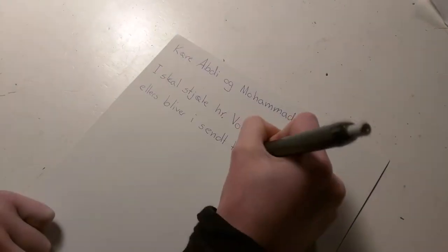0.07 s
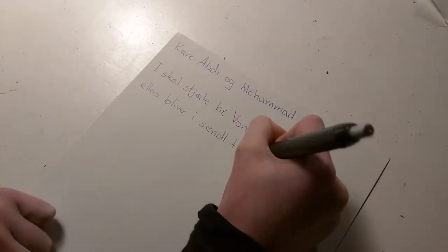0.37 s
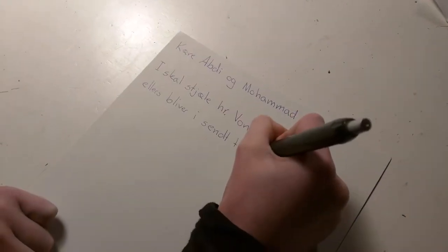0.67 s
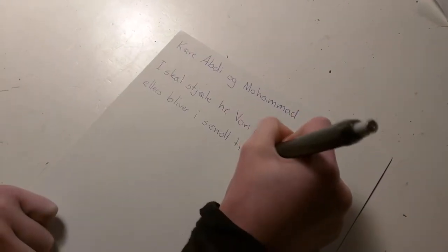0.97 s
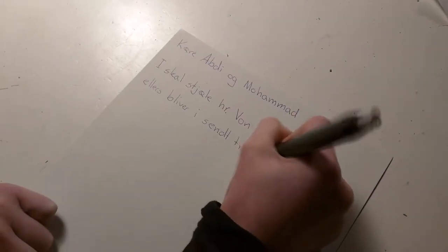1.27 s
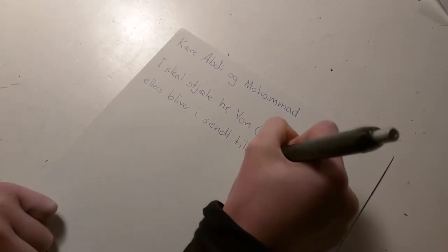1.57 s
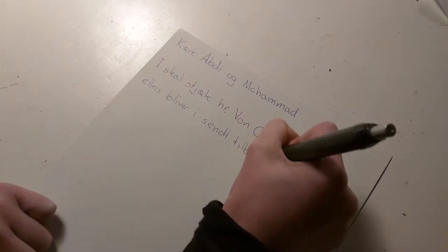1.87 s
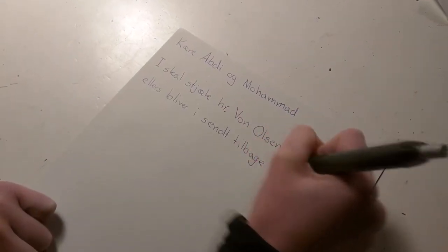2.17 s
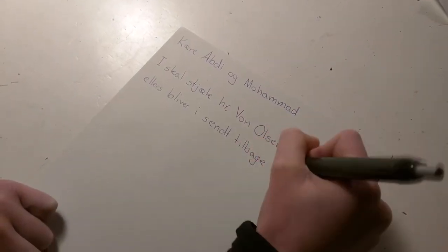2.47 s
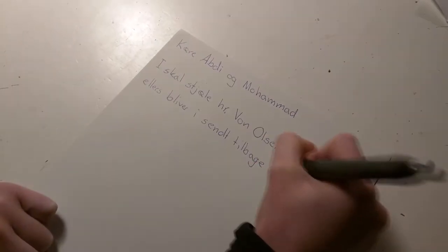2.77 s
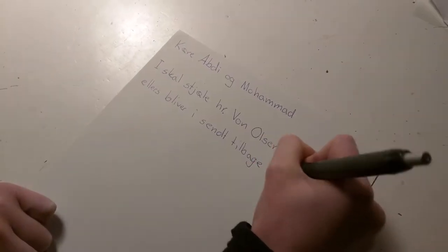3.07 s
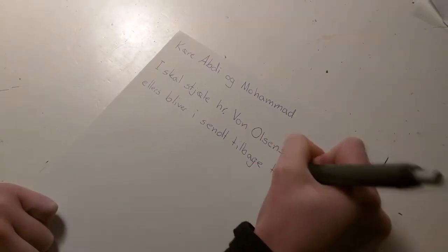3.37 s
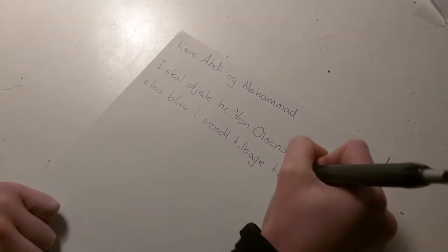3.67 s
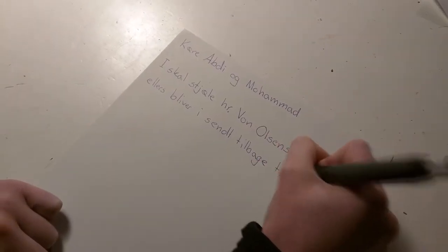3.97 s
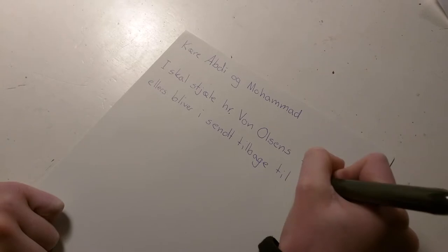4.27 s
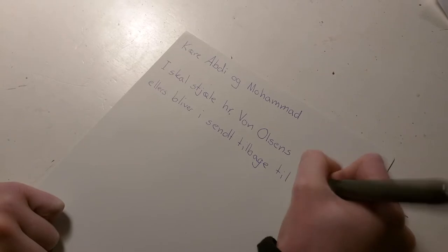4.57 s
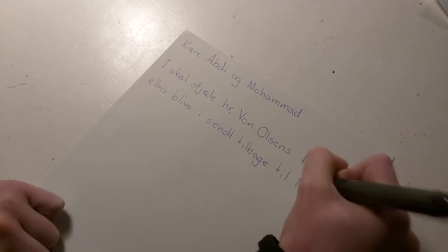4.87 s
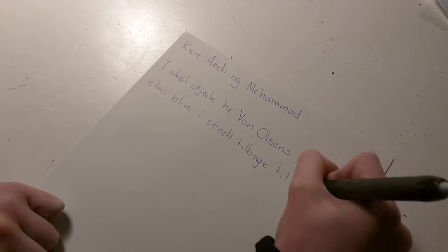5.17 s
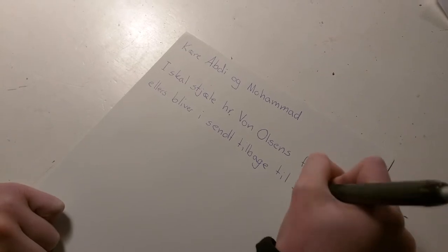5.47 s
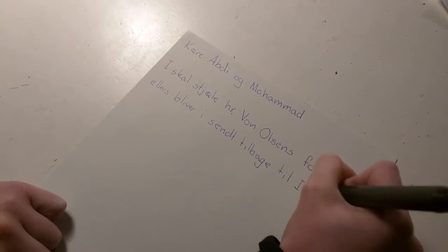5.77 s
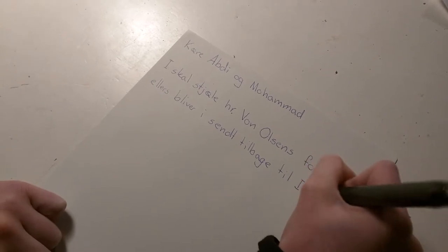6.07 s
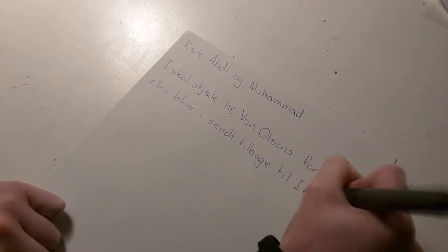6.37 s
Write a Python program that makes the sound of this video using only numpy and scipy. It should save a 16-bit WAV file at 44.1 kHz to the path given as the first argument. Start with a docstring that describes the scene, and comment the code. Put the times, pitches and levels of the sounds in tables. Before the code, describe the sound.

A ballpoint pen writes on a single sheet of paper on a hard table, close to the microphone in a quiet room. Quick, dry strokes come in short runs, each with a low thrum from the tabletop. Between runs the tip lands with light ticks and knocks, and the hand slides with soft hisses. Three sharper knocks with a tiny pen rattle stand out in the second half.

```python
"""Quick ballpoint strokes thrum and rasp on one sheet of paper on a hard table: the ball rolls over fibres
and rings table top and tip. Sliding hand and pen strokes add brief, soft hisses. The pen lands with a tick,
a knock and a short rattle of the refill. The resting hand sways the table; the shaking reaches the two
microphone ports of a camera close by. Quiet room air and a thin whine lie underneath."""
import sys
import numpy as np
from scipy import signal
from scipy.fft import rfft, irfft
from scipy.io import wavfile
from scipy.ndimage import uniform_filter1d

SR = 44100
rng = np.random.default_rng(int(sys.argv[2]) if len(sys.argv) > 2 else 0)


def wav_record(signal):
    """Record a signal, one row per channel, as 16-bit PCM in the file named by sys.argv[1]."""
    frames = np.transpose(np.atleast_2d(signal))
    bounded = np.clip(frames, -1, 1)
    # unit amplitude maps onto the largest positive 16-bit level
    quanta = np.round(bounded * 32767).astype(np.int16)
    wavfile.write(sys.argv[1], SR, quanta)


N = 287973
T = np.arange(N) / SR

# Levels are relative, ahead of mix gains. Side is left minus right.
# evenly paced strokes, push and pull in turn:
# first t/s, last t/s, length/s, rasp over thrum/dB, hiss over thrum/dB, [thrum level/dB per stroke]
STROKE_RUNS = [(.012, .12, .049, -21.3, -24.5, [-34, -30.5]),
               (.207, .92, .051, -20.3, -32, [-34.5, -33, -36, -39.5, -32.5, -28.5, -33, -36.5]),
               (1.008, 1.101, 0.044, -20.5, -23.5, [-28, -28]),
               (1.19, 1.679, .042, -18.9, -13, [-26.2, -30, -26.5, -28.6, -28.8, -31.3, -27.5]),
               (1.765, 1.765, .037, -14.3, -21, [-27.5]),
               (2.713, 3.113, .044, -20.8, -31, [-25, -30, -35, -35.5, -37.5, -38]),
               (3.27, 3.588, .045, -20.3, -28, [-42.5, -36.5, -40, -43, -40.5]),
               (3.832, 4.062, .039, -18.5, -23.5, [-35.3, -34.3, -38.5, -39.7]),
               (4.229, 4.716, .043, -18.3, -27, [-43.5, -41.5, -36, -44.5, -41.5, -37, -36.3]),
               (4.913, 4.913, .043, -17, -34, [-28.5]),
               (5.09, 5.272, .047, -15.7, -32, [-37.5, -30.5, -43]),
               (5.39, 5.528, .068, -17.3, -27, [-36, -35.5, -32]),
               (5.922, 6.294, .041, -20.3, -33, [-29.7, -44, -36, -36.5, -37]),
               (6.405, 6.518, .037, -22, -31, [-35.3, -35.7])]
# brief hisses on the sheet, from the sliding hand or a pen stroke: middle t/s, length/s, level/dB
PAPER_SWISHES = [(.93, .031, -55.5), (1.782, .02, -44), (1.823, .02, -42), (1.99, .048, -57.5),
                 (2.062, 0.037, -52), (2.125, 0.054, -48), (2.355, .05, -61), (2.94, .061, -54.5),
                 (3.257, .035, -56), (3.344, .047, -54), (3.414, .058, -53), (3.538, .066, -55.5),
                 (3.677, 0.059, -52), (3.888, .08, -56), (4.02, 0.056, -55), (4.16, 0.046, -49),
                 (4.295, 0.032, -52.5), (4.465, .06, -50), (4.57, .048, -53.5), (4.648, .058, -49),
                 (4.79, .04, -60), (5.49, .022, -54), (5.79, .037, -52.5)]
# hand weight rocking the table: t/s, level/dB
SWAY_LEVELS = [(0, -29), (1.25, -26.5), (1.85, -23.5), (2.2, -37.5), (2.55, -35), (2.9, -30), (4.5, -31.5),
               (5.501, -29), (6.53, -30.5)]
# pen or hand lands, or loose pen parts tick: t/s, tick level/dB, knock level/dB
LANDINGS = [(.293, -26, -46), (1.8773, -35.5, -49), (1.978, -58, -33), (2.022, -48, -28.5),
            (2.4054, -46, -27.5), (2.608, -27, -58), (2.614, -45, -34), (2.6242, -34, -46),
            (2.637, -36, -32.5), (3.7574, -18, -16), (3.785, -33, -49), (4.199, -35.5, -34.5),
            (4.231, -33, -39), (4.8532, -19.7, -15), (5.0215, -20.7, -15.3), (5.4749, -31, -30),
            (5.8453, -24, -22), (5.875, -39, -54), (6.258, -37, -56)]
# resonances: f/Hz, t60/s, level at first spot/dB, level at second spot/dB, side/dB
TABLE_MODES = [(81.3, 0.19, -4, -3, -1), (135.2, 0.14, -7.5, -13.5, -1.5), (158, .07, -15, -19, 9),
               (210.2, 0.079, -5.5, -8, 2), (273.5, 0.069, -4.5, -3.5, -3.5), (316, 0.038, -5.5, -13.5, 1),
               (386, 0.033, -5.5, -22, -15.5), (440, 0.042, -7, -19.5, -4.5), (552.9, 0.082, -8, -8, 3.5),
               (718, 0.032, -14, -12.5, -13), (830, 0.043, -20, -21, -4)]
TIP_MODES = [(760, 0.028, -4.5, -1.5, -6), (967, 0.028, -3.5, -7, -4), (1172, 0.12, -8.5, -9, -8),
             (1340, 0.044, -2.5, -21, -3), (1463, 0.021, 0.5, 1, 1), (1747, 0.02, -8.5, 1, -9),
             (1915, 0.034, -3.5, 1, -5), (2150, 0.013, -21, -6, -4), (2670, 0.011, -9, -9.5, 2)]  # pen and the sheet under it
# spectral densities: f/Hz, level/dB
THRUM_SPECTRUM = [(20, -20), (45, -5.5), (80, 7), (130, 5.5), (280, -6.5), (400, -16.5), (560, -25),
                  (750, -28.5), (1100, -40.5), (2500, -48), (6000, -51)]
RASP_SPECTRUM = [(200, -14), (600, 0.5), (1100, -7), (1900, -5), (2400, -5.5), (3200, -6.5), (4300, -10),
                 (6000, -10), (10000, -14), (15000, -23.5)]
HISS_SPECTRUM = [(100, 14), (500, -5.5), (1200, -8.5), (2200, -1.5), (4200, -4), (5500, -3), (6500, -0.5),
                 (7600, 0), (10000, -0.5), (12000, -3.5), (15000, -14)]
SWAY_SPECTRUM = [(5, -2.5), (14, 11), (31, -1), (45, 1), (65, -13.5), (120, -32), (250, -64), (800, -61.5)]
AIR_SPECTRUM = [(20, 3.5), (90, -3.5), (250, -16), (600, -21), (1200, -25.5), (2000, -29.5), (4000, -34.5),
                (10000, -36), (15000, -42)]
TICK_SPECTRUM = [(300, -38), (1500, -8), (3000, 2.5), (5800, 4.5), (9000, 3), (11500, 2), (15000, -9.5)]
RATTLE_SPECTRUM = [(500, -12), (2500, -4.5), (4000, -9), (6000, -12), (8000, -9), (11000, -2.5),
                   (15000, -31)]
# likeness of the two ports: f/Hz, correlation (-1..1)
SOLID_CORRELATION = [(30, -.75), (130, -0.51), (200, -0.3), (300, 0.82), (550, 1), (1000, 0.87),
                     (3000, 0.77)]  # low table shaking arrives in opposite sign
AIR_CORRELATION = [(60, -0.19), (300, 0.29), (1000, 0.35), (3000, 0.7), (6500, 0.16), (14000, 0.39)]
# hiss balance: f/Hz, side/dB
HISS_BALANCE = [(300, -13), (2000, -5), (3500, -5.5), (5700, -8.5), (7500, -11.5), (10000, -1),
                (14000, -9.5)]
# room decay: f/Hz, t60/s
ROOM_DECAY = [(100, 0.74), (1000, 0.48), (5000, 0.17), (15000, 0.055)]
# hand moves from first to second spot: start t/s, end t/s
HAND_MOVE_S = (1.73, 2.4)


def amp(db):
    """Decibels to gain."""
    return 10 ** (np.asarray(db) / 20)


def unit(x):
    """Scale to rms 1."""
    return x / np.sqrt(np.mean(x ** 2) + 1e-20)


def read(points, hz):
    """Interpolate a table over log frequency."""
    knots_hz, values = np.transpose(points)
    return np.interp(np.log(hz + 1), np.log(knots_hz + 1), values)


def pan(side_db):
    """Left and right gains at constant power."""
    gains = amp(np.array([np.atleast_1d(side_db), -np.atleast_1d(side_db)]) / 2)
    return gains / np.sqrt((gains ** 2).mean(0))


def add(mix, start_s, sound):
    """Mix in a stereo sound."""
    part = mix[:, round(start_s * SR):][:, :sound.shape[1]]
    part += sound[:, :part.shape[1]]


def convolve(x, response):
    """Filter each channel; at most N samples."""
    return signal.fftconvolve(np.atleast_2d(x), np.atleast_2d(response), axes=1)[:, :N]


def colour(spectrum, size=2048):
    """Causal impulse response of energy 1 for a spectrum."""
    log_gain = np.log(amp(read(spectrum, abs(np.fft.fftfreq(size, 1 / SR)))))
    response = np.fft.ifft(np.exp(np.conj(signal.hilbert(log_gain)))).real
    return response / np.linalg.norm(response)


def ports(pair, spectrum, correlation, side_db):
    """Two independent noises to coloured, partly correlated stereo of rms 1."""
    hz = np.fft.rfftfreq(N, 1 / SR)
    a, b = rfft(pair)
    same = np.clip(read(correlation, hz), -1, 1)
    mid, side = a * np.sqrt(1 + same), b * np.sqrt(1 - same)
    stereo = np.array([mid + side, mid - side])
    return unit(irfft(stereo * amp(read(spectrum, hz)) * pan(side_db), N))


def fibres(snags_per_s, spread_db, rub_gain):
    """Two trains of tiny, uneven snags over steady rubbing noise."""
    snags = (rng.random(N) < snags_per_s / SR) * amp(spread_db * np.minimum(rng.exponential(1, N), 4))
    return unit(snags * rng.standard_normal((2, N))) + rub_gain * rng.standard_normal((2, N))


def flutter(rate_hz, depth_db):
    """Randomly wandering gain, as when friction grips and lets go."""
    knots = rng.standard_normal(N)
    return amp(depth_db * np.interp(T * rate_hz, np.arange(N), knots))


def patchy(x, depth_db):
    """Drifting noise colour, as when new patches of paper make contact."""
    bins = signal.stft(x, nperseg=512)[2]
    patches = uniform_filter1d(rng.standard_normal(bins.shape[1:]), size=7, axis=0)
    patches = unit(uniform_filter1d(patches, size=10, axis=1))
    return unit(signal.istft(bins * amp(depth_db * patches), nperseg=512)[1][:, :N])


def swells(middles_s, lengths_s, levels_db, rise, fall):
    """Envelope of a series of movements; higher rise or fall is more abrupt."""
    t = T[::32]
    power = sum(amp(db) ** 2 * np.exp(-abs(2 * (t - s) / length_s) ** np.where(t < s, rise, fall))
                for s, length_s, db in zip(middles_s, lengths_s, levels_db))
    return np.interp(T, t, np.sqrt(power))


def mode(hz, t60_s, side_db):
    """One decaying resonance; the lowest push the ports opposite ways."""
    t = T[:SR // 4]
    phase_rad = np.arccos(np.clip(read(SOLID_CORRELATION, hz), -1, 1)) * np.array([[.5], [-.5]])
    return pan(side_db) * np.exp(-np.log(1000) * t / t60_s) * np.sin(2 * np.pi * hz * t + phase_rad)


def ringing(modes, drive, wander_db):
    """Friction drives each mode by an amount set by the ball's position."""
    out = 0
    for hz, t60_s, first_db, second_db, side_db in modes:
        spot_db = np.interp(T, HAND_MOVE_S, [first_db, second_db])
        coupling = amp(spot_db) * flutter(rate_hz=14, depth_db=wander_db)
        ring = mode(hz, t60_s, side_db)
        force = drive(hz) * coupling * rng.standard_normal(N)
        out = out + convolve(force, ring) / np.linalg.norm(ring)
    return out


def strokes(pull_lag_s=.004, pull_rasp_db=-1.2, pull_hiss_db=-15, shortening_per_db=.015, bite=.1):
    """Runs to strokes. Pulls come late, with less rasp and hiss; strong strokes are shorter, raspier."""
    rows = []
    for first_s, last_s, length_s, rasp_db, hiss_db, levels_db in STROKE_RUNS:
        beats_s = np.linspace(first_s, last_s, len(levels_db))
        for k, (beat_s, thrum_db) in enumerate(zip(beats_s, levels_db)):
            pulled, accent_db = k % 2, thrum_db - np.mean(levels_db)
            rows.append((beat_s + pulled * pull_lag_s,
                         length_s * np.exp(-shortening_per_db * accent_db),
                         thrum_db,
                         thrum_db + rasp_db + bite * accent_db + pulled * pull_rasp_db,
                         thrum_db + hiss_db + pulled * pull_hiss_db))
    return np.transpose(rows)


def writing(even_db=16.5, pivot_hz=260, brightening=.91):
    """The ball bumps over fibres: the table thrums and rings below, the tip rasps above."""
    middle_s, length_s, thrum_db, rasp_db, _ = strokes()
    grip = flutter(rate_hz=220, depth_db=1.62)

    def force(hz):
        """A fast, raspy stroke shifts its push from low modes to high."""
        tilt_db = brightening * np.log(hz / pivot_hz) * (rasp_db - thrum_db + even_db)
        return swells(middle_s, length_s, thrum_db + tilt_db, rise=4.3, fall=3.4) * grip

    coarse = fibres(snags_per_s=900, spread_db=3, rub_gain=.86)
    thrum = force(hz=113) * ports(coarse, THRUM_SPECTRUM, SOLID_CORRELATION, side_db=1)
    speed = swells(middle_s, length_s, rasp_db, rise=2.6, fall=3) * grip
    fine = fibres(snags_per_s=2200, spread_db=2.5, rub_gain=1)
    rasp = speed * patchy(ports(fine, RASP_SPECTRUM, AIR_CORRELATION, side_db=-4), depth_db=2.5)
    table = ringing(TABLE_MODES, force, wander_db=3.5)
    tip = ringing(TIP_MODES, lambda hz: speed, wander_db=2)
    return amp(-2) * thrum + amp(-4) * table + amp(-1) * rasp + amp(-2.4) * tip


def paper_hiss(lag_s=.004, stroke_share=.88):
    """Bright friction, to the right: brief swishes of hand or pen, plus the hiss of the stroke runs."""
    middle_s, length_s, _, _, hiss_db = strokes()
    swishes = swells(*np.transpose(PAPER_SWISHES), rise=2.6, fall=2.9)
    runs = swells(middle_s + lag_s, stroke_share * length_s, hiss_db, rise=2.3, fall=2.8)
    side_db = read(HISS_BALANCE, np.fft.rfftfreq(N, 1 / SR))
    grain = fibres(snags_per_s=7000, spread_db=0, rub_gain=1.25)
    hiss = patchy(ports(grain, HISS_SPECTRUM, AIR_CORRELATION, side_db), depth_db=3.5)
    return amp(3) * hiss * np.hypot(swishes, runs) * flutter(rate_hz=180, depth_db=2)


def table_sway():
    """The resting hand rocks the table: a very low rumble."""
    times_s, levels_db = np.transpose(SWAY_LEVELS)
    rumble = ports(rng.standard_normal((2, N)), SWAY_SPECTRUM, SOLID_CORRELATION, side_db=-2.5)
    return amp(np.interp(T, times_s, levels_db)) * rumble


def air_and_whine(whine_hz=1172, whine_db=-73):
    """Quiet room air and a thin, wavering tone."""
    noise = ports(rng.standard_normal((2, N)), AIR_SPECTRUM, AIR_CORRELATION, side_db=-1.5)
    air = amp(-47) * patchy(noise, depth_db=2.5)
    whine_gain = amp(whine_db) * flutter(rate_hz=12, depth_db=4)
    drift_rad = 4 * flutter(rate_hz=12, depth_db=.5)
    return air + whine_gain * np.sin(2 * np.pi * whine_hz * T + drift_rad)


def reflections(x, earliest_s=.001, spread_s=.014, count=10):
    """Echoes off hand, table and wall comb both ports alike."""
    delays_s = earliest_s + spread_s * rng.random(count)
    gains = rng.standard_normal(count)
    echoes = np.zeros(SR // 10)
    echoes[(delays_s * SR).astype(int)] = gains / np.linalg.norm(gains)
    return convolve(x, signal.lfilter([.5, -.5], [1, -.6], echoes))  # small surfaces return only treble


def room(x):
    """Small-room tail, shorter in the treble."""
    hz, t, bins = signal.stft(rng.standard_normal((2, SR // 2)), SR, nperseg=256)
    decay = np.exp(-np.log(1000) * t / read(ROOM_DECAY, hz)[:, None])
    tail = signal.istft(bins * decay, SR, nperseg=256)[1]
    return convolve(x, tail / np.linalg.norm(tail[0]))


def ticks(bounce_s=.0094, second_bounce_db=-4):
    """The tip ticks; the refill bounces twice in the barrel, looser after a hard knock."""
    out, t = np.zeros((2, N)), T[:SR // 4]
    barrel_buzz = np.exp(-t / .0015) + .12 * np.exp(-t / .0083)
    for start_s, tick_db, knock_db in LANDINGS:
        rattle_db = tick_db + np.interp(knock_db, [-21, -16], [-25, -4])
        hits = [(TICK_SPECTRUM, 1.1, tick_db), (RATTLE_SPECTRUM, .8, rattle_db),
                (RATTLE_SPECTRUM, .8, rattle_db + second_bounce_db)]
        for k, (spectrum, impulse, level_db) in enumerate(hits):
            crack = .17 * rng.standard_normal((2, len(t))) * barrel_buzz
            crack[:, 0] += impulse
            click = convolve(crack, colour(spectrum))
            add(out, start_s + k * bounce_s, amp(level_db + 1.5) * pan(side_db=-1.7) * click)
    return out


def knocks(lag_s=.001323, dip_hz=37, dip_decay_s=.024, push_s=.0032, t60_scale=.83, padded_hz=200):
    """A landing rings table and tip; the whole top dips and swings back."""
    out, t = np.zeros((2, N)), T[:SR // 4]
    # the hard tip favours upper modes and damps the table while pressed
    rings = [(hz, amp(db - 6.5) * (hz / 250) ** .2 * mode(hz, t60_scale * t60_s, side_db))
             for hz, t60_s, _, db, side_db in TABLE_MODES]
    tip = amp(-27) * sum(amp(db) * mode(hz, t60_s, side_db) for hz, t60_s, _, db, side_db in TIP_MODES)
    swing = np.sin(2 * np.pi * dip_hz * t) * np.exp(-t / dip_decay_s)
    push = .52 * t / push_s * np.exp(-(t / push_s) ** 2)
    dip = amp(2) * (swing + push) * np.array([[.9], [-2.4]])
    for start_s, tick_db, knock_db in LANDINGS:
        # more knock than tick: a flesh-padded blow, weak in the upper modes
        dull_db_per_oct = .2 * max(knock_db - tick_db - 4, 0)
        table = sum(amp(-dull_db_per_oct * max(np.log2(hz / padded_hz), 0)) * ring for hz, ring in rings)
        add(out, start_s + lag_s, amp(knock_db) * (dip - table - tip))
    return out


def scene():
    """Pen, hand and table in the room."""
    friction = writing() + paper_hiss()
    near = friction + amp(-4.5) * reflections(friction) + ticks() + knocks()
    return near + amp(-20) * room(near) + table_sway() + air_and_whine()


def record(dry, cutoff_hz=15120):
    """Steep low-pass band limit."""
    lowpass = signal.firwin(511, cutoff_hz, window=("kaiser", 9), fs=SR)
    return signal.oaconvolve(dry, lowpass[None], "same")


dry = scene()
out = record(dry)
wav_record(out)
```